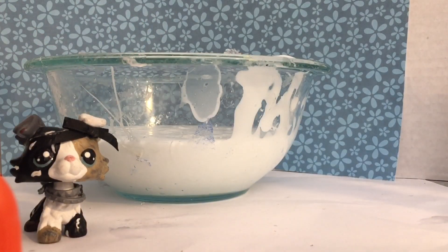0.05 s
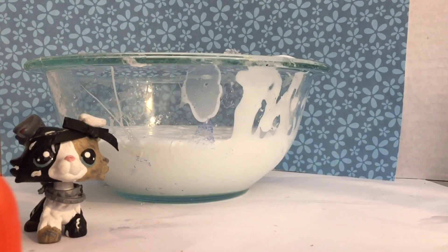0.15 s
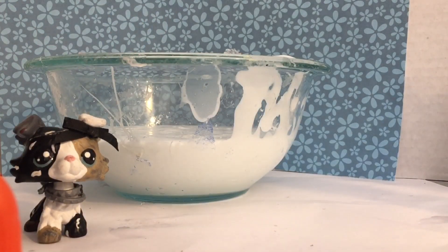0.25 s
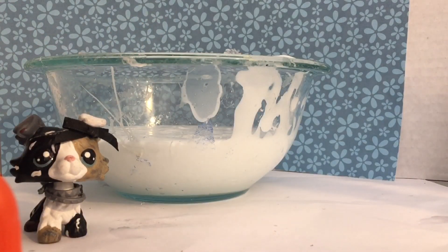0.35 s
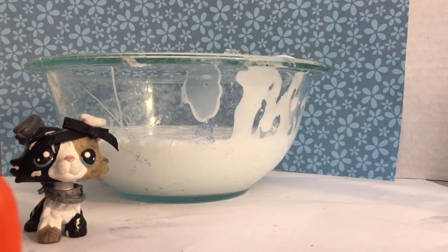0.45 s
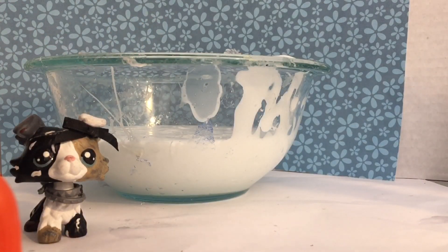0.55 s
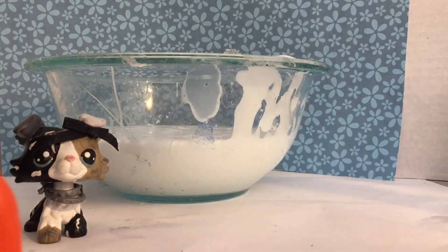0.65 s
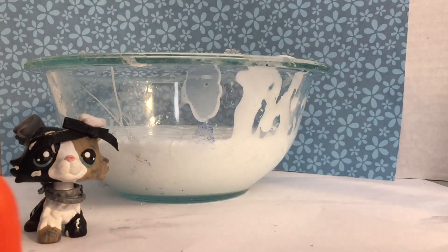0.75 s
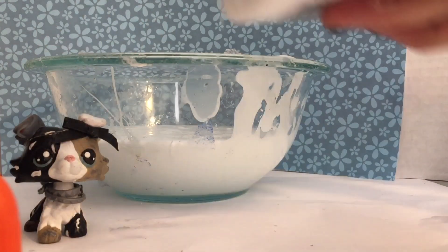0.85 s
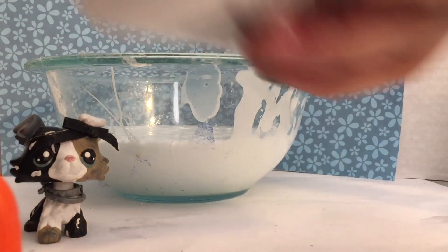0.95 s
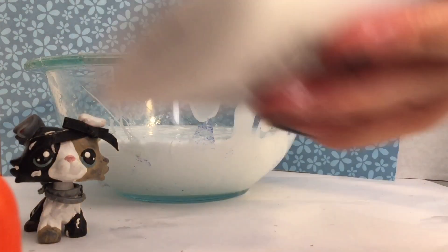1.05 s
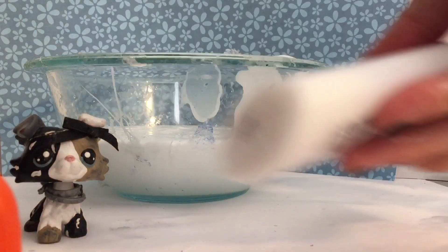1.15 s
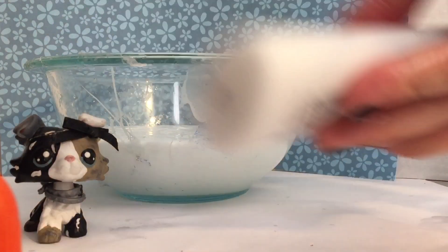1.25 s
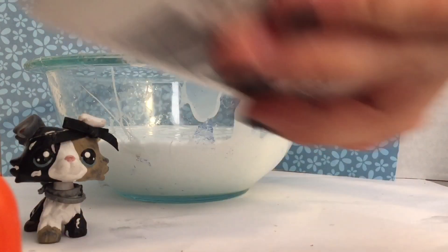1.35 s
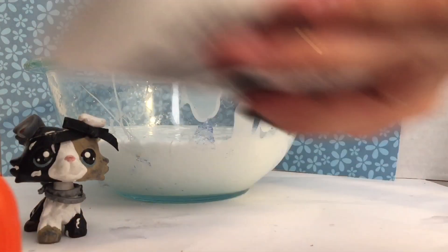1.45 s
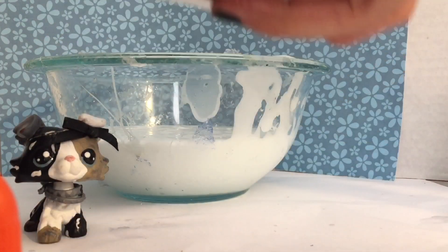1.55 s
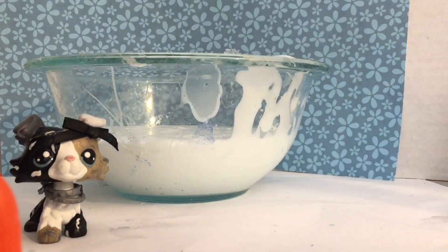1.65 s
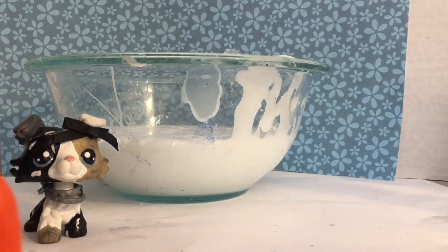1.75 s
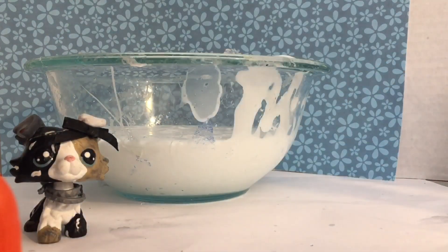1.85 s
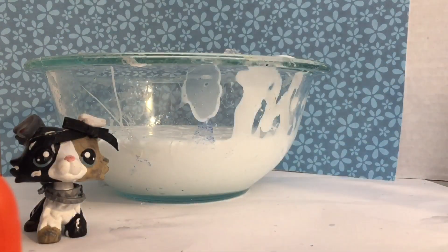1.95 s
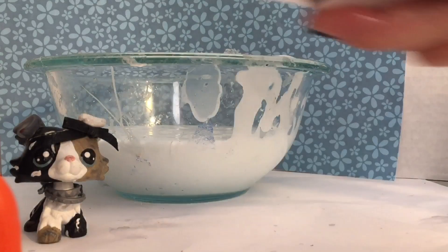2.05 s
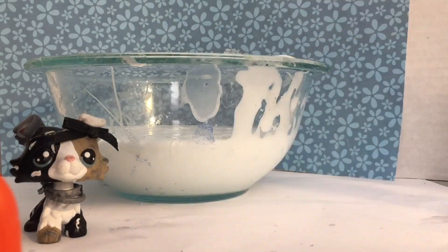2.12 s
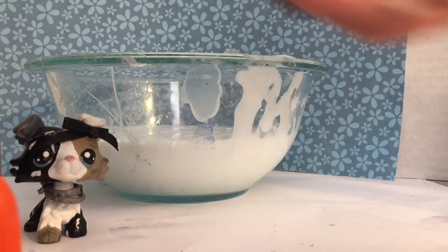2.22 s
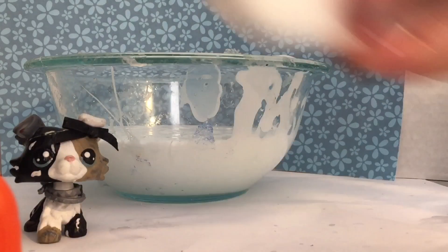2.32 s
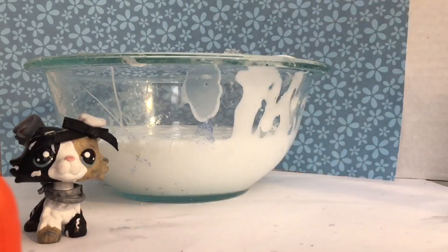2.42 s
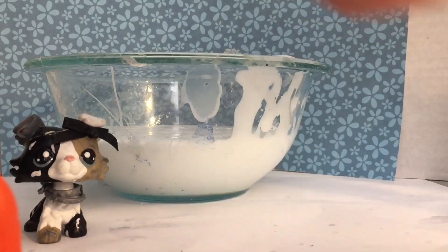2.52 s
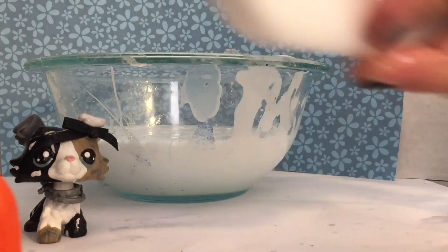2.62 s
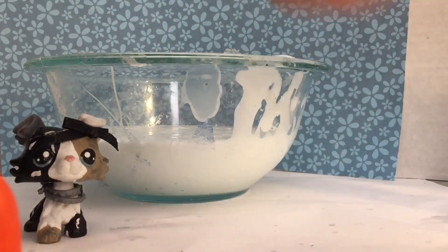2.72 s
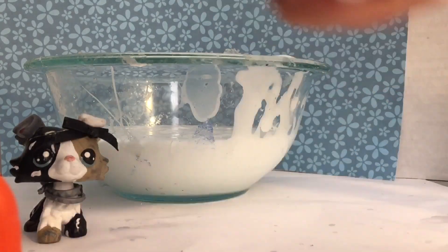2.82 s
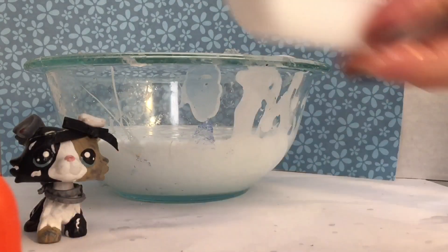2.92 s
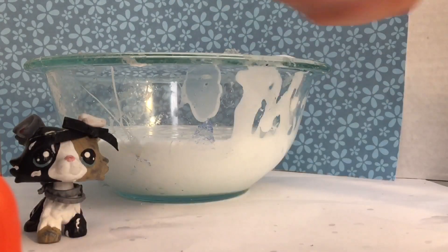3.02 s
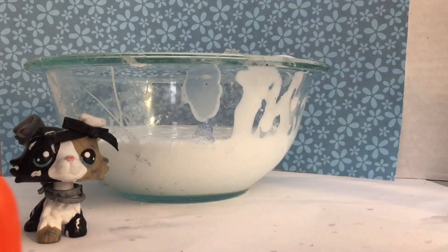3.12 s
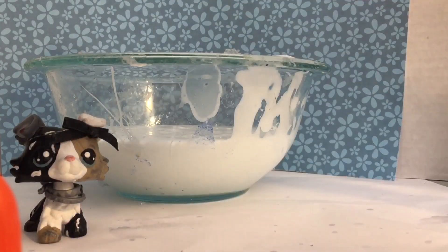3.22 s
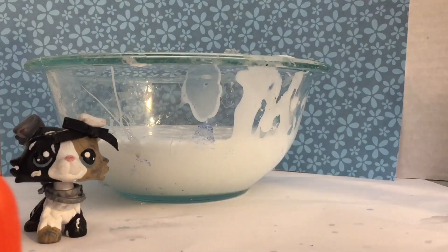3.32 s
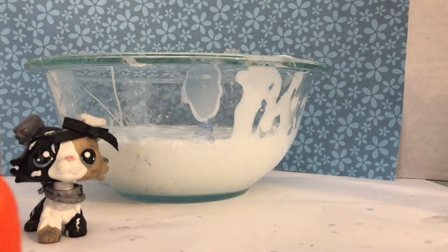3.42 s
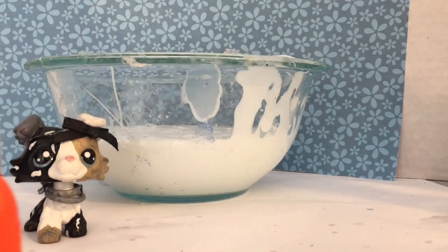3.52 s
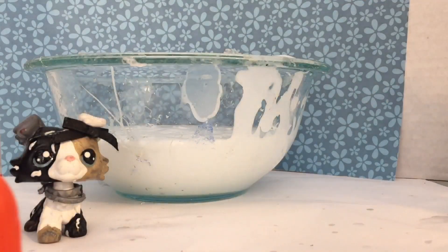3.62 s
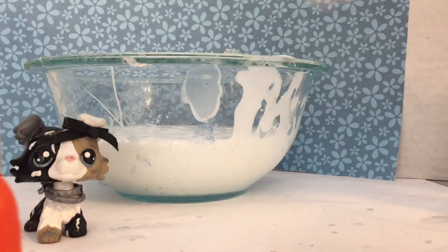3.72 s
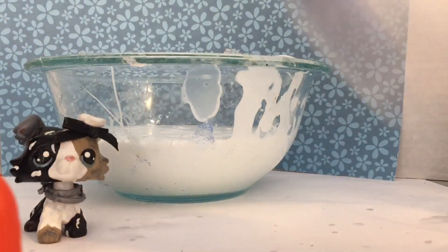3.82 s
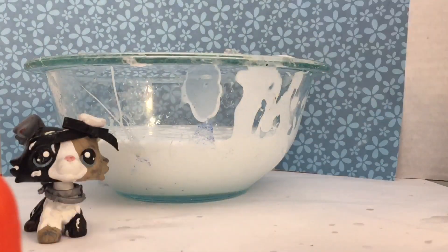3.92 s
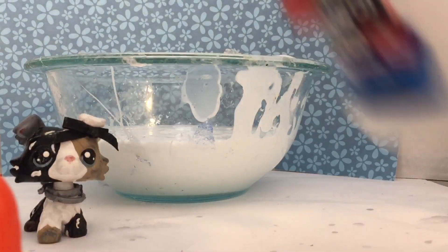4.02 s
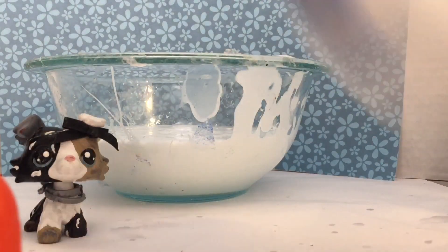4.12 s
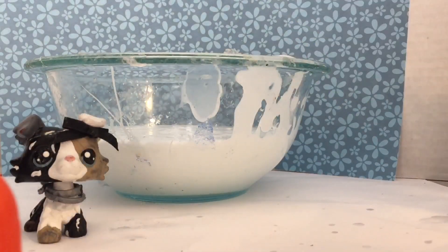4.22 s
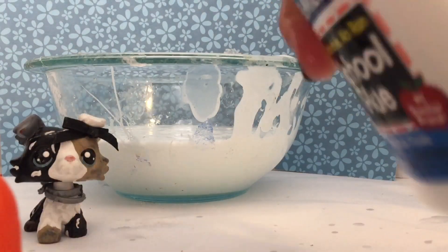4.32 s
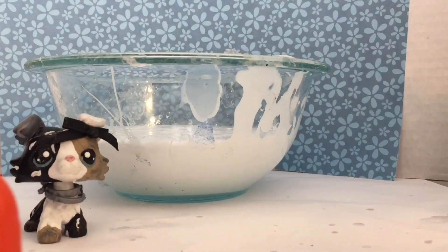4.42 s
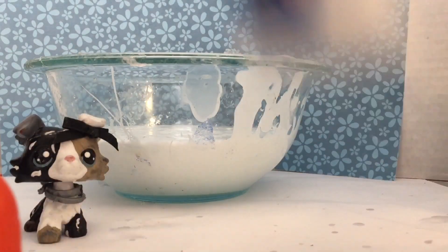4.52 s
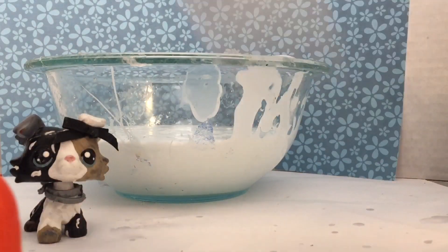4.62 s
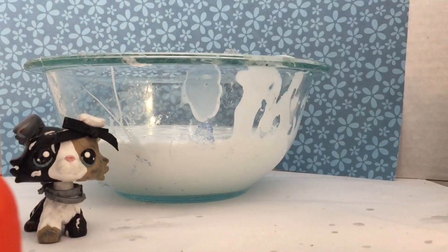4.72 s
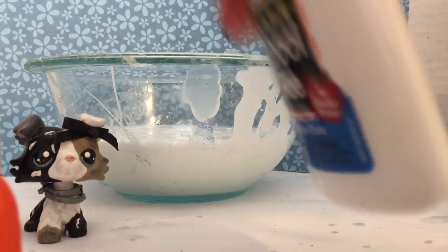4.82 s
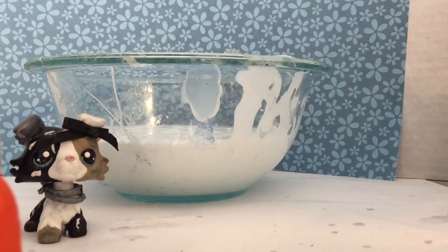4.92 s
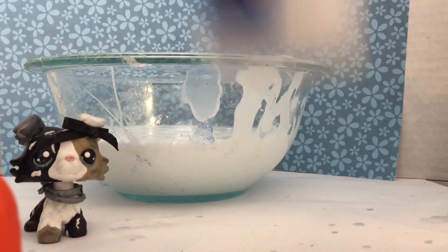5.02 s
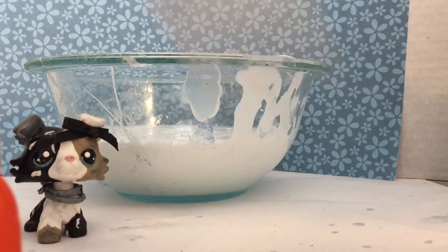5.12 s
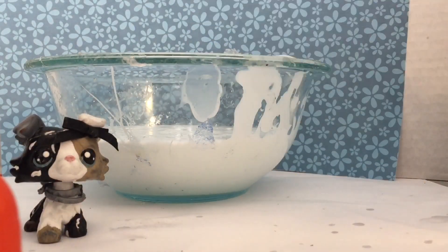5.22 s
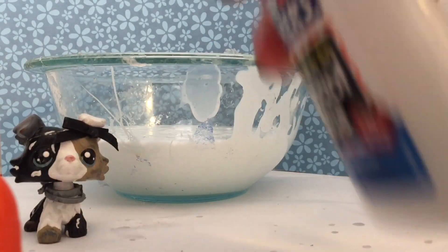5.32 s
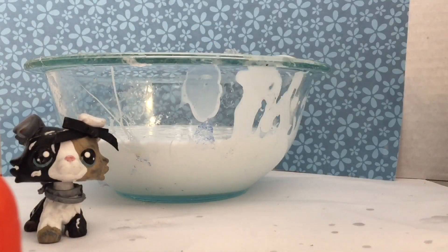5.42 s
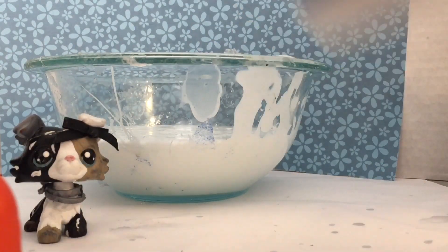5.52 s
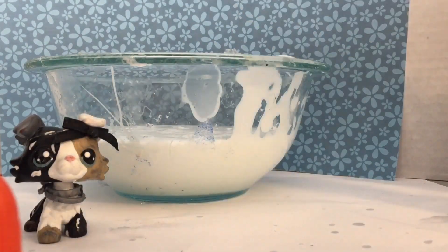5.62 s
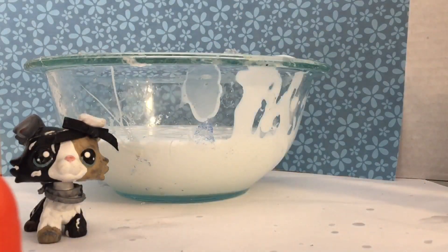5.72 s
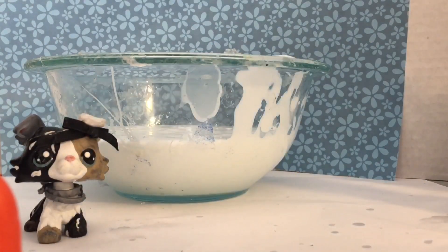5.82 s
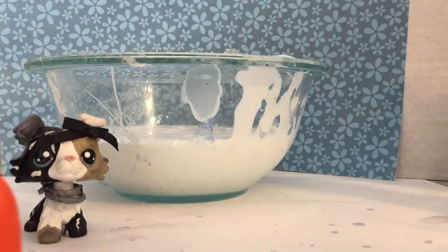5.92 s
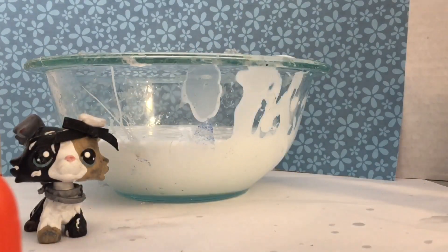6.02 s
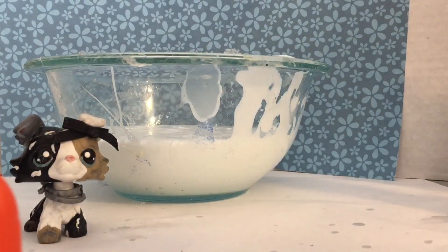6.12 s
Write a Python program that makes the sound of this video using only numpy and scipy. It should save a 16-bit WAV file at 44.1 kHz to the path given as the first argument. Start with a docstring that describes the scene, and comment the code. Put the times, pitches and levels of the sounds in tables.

```python
"""In a small room, close up, a plastic glue bottle with some water in it is shaken hard in three bouts.
At each turn of the hand the liquid surges against a wall: short-lived bubbles ring through the plastic
and foam crackles. Big air pockets plop, films snap and air whistles thinly at the nozzle.
Between bouts the hand rubs and bumps the bottle. Under it lie room tone, hum and air stirred by the arm."""
import sys
import numpy as np
from scipy import signal
from scipy.fft import rfft, irfft
from scipy.io import wavfile
from scipy.ndimage import uniform_filter1d, map_coordinates

SR = 44100
rng = np.random.default_rng(int(sys.argv[2]) if len(sys.argv) > 2 else 0)


def put_to_file(sound):
    """Save the sound as 16-bit audio at rate SR, in the file named by the first command-line argument."""
    columns = np.atleast_2d(sound).T  # one column per channel
    safe = np.clip(columns, -1, 1)
    whole_steps = np.round(safe * 32767)
    wavfile.write(sys.argv[1], SR, whole_steps.astype(np.int16))


N = 271215
TOP_HZ, NOZZLE_HZ = 16150, 9610  # band limit; pitch of the nozzle

# quick flicks of the wrist: t/s, bubble level/dB, foam level/dB
WRIST_FLICKS = [(0.868, -56, -46), (0.938, -32, -41.5), (1.005, -36.5, -36), (1.074, -34, -38),
                (1.14, -34, -35), (1.213, -29.5, -37.5), (1.27, -37, -35.5), (1.338, -33, -37.5),
                (1.403, -29.5, -33.5), (1.475, -31, -34), (1.534, -34, -35.5), (1.585, -36.5, -43),
                (2.185, -41, -46), (2.245, -25.5, -36.5), (2.312, -33, -35), (2.393, -29.5, -39),
                (2.464, -31, -32.5), (2.544, -28.5, -37.5), (2.603, -31, -33.5), (2.689, -31, -36.5),
                (2.751, -34, -32.5), (2.824, -34, -40.5), (2.885, -45, -37), (2.964, -32, -37.5),
                (3.028, -26, -35.5), (3.107, -38, -40.5), (3.215, -41.5, -55), (5.723, -39.5, -49),
                (5.808, -34, -39.5)]
# long arm strokes in the last bout: landing t/s, its bubble level/dB, slap lead/s, its bubble level/dB
ARM_STROKES = [(3.804, -27, 0.049, -34), (3.971, -24.5, 0.062, -27), (4.134, -23.5, 0.07, -33.5),
               (4.278, -26, 0.065, -27), (4.446, -25.5, 0.073, -33), (4.611, -21.5, 0.068, -33),
               (4.781, -23, 0.074, -29.5), (4.947, -22, 0.065, -28.5), (5.112, -21.5, 0.071, -29.5),
               (5.277, -24.5, 0.068, -28.5), (5.426, -23, 0.07, -28), (5.604, -29, 0.078, -32),
               (5.906, -26, 0.056, -63), (6.067, -27.5, 0.099, -34.5)]
def surges():
    """Cue list for the slosh: a flick throws the liquid once, a stroke twice."""
    # envelopes: rise/s, hold/s, fall/s
    flick = (0.007, 0.017, 0.03)  # the liquid hits a wall and runs off
    slap = (0.006, 0.00317, 0.067)  # on the back swing it slaps one end and slides along the bottle
    landing = (0.014, 0.024, 0.0075)  # then the whole load piles up and stops
    # cues: t/s, bubble level/dB, foam level/dB, envelope, bubble f/Hz, spray against crackle/dB
    cues = [(s, db, foam_db, flick, 763.6, -7.5) for s, db, foam_db in WRIST_FLICKS]
    for s, landing_db, lead, slap_db in ARM_STROKES:
        for at, db, envelope, hz in [(s - lead, slap_db, slap, 897), (s, landing_db, landing, 898.6)]:
            foam_db = -33.5 + 0.51 * (db + 25.5)  # harder surges raise more foam
            cues.append((at, db, foam_db, envelope, hz, -13.5))
    return cues


# what the plastic wall lets through: f/Hz, level/dB
WALL_EQ = [(40, -20), (150, 6), (340, -1), (470, -2.5), (610, -3), (695, 5), (780, -3.5), (1000, 0),
           (1300, -6.5), (1650, 1), (2300, -11), (4000, -5.5), (9000, -38)]
# colour of the foam: f/Hz, level/dB
FOAM_EQ = [(300, -17.5), (1200, 11.5), (2300, 0.5), (4100, -0.5), (6200, -3), (8500, -7), (9600, -5),
           (10600, -13.5), (16000, -19.5)]
def slosh():
    """Each surge folds air into the liquid: a gurgle, a crackle of foam and a spray of tearing films."""
    out = np.zeros(N)
    for s, bubble_db, foam_db, (rise, hold, fall), pitch_hz, spray_db in surges():
        t = np.arange(-int(4 * rise * SR), int((hold + 3.5 * fall) * SR)) / SR
        crest = np.exp(-np.maximum(-t / rise, np.maximum(t - hold, 0) / fall) ** 0.98)
        # thick liquid breaks in lumps, most on the flanks; foam has its own clumps and dies sooner
        swell = crest * amp(8.3 * flutter(t, rate=150) * (1 - crest / 2))
        foam_swell = swell * crest ** 0.18 * amp(4 * flutter(t, rate=150))
        gurgle = bubbles(len(t), rate=620, hz=pitch_hz, spread=0.5605, cycles=2.07, scatter_db=5)
        crackle = bubbles(len(t), rate=2400, hz=4900, spread=0.557, cycles=3.5, scatter_db=5, size=400)
        fizz = coloured(crackle + rng.standard_normal(len(t)), FOAM_EQ, size=512)
        foam = unit(fizz) + amp(spray_db) * tearing(len(t), rate=500, scatter_db=8.5)
        detune = np.exp(0.044 * rng.standard_normal())  # the moving load retunes the wall each surge
        gurgle = coloured(gurgle, np.array(WALL_EQ) * [detune, 1], size=2048)
        add(out, s + t[0], amp(bubble_db - 1) * swelled(gurgle, swell))
        add(out, s + t[0], amp(foam_db + 1) * swelled(foam, foam_swell))
    return out


def bubbles(n, rate, hz, spread, cycles, scatter_db, size=1000):
    """A cloud of bubbles, n samples long: each rings a few cycles, rising in pitch."""
    draws = rng.standard_normal((int(rate * n / SR) + 1, 4))
    starts = ((np.arange(len(draws)) + draws[:, 0]) * SR / rate).astype(int) % n
    pitch, weight, life = np.clip(draws[:, 1:], -2, 2).T[:, :, None]
    turns = np.minimum(hz * np.exp(spread * pitch), TOP_HZ) * np.arange(size) / SR
    age = turns / (cycles * np.exp(0.5 * life))
    strength = amp(scatter_db * weight) * np.exp(spread * pitch / 2)
    polarity = rng.choice([-1, 1], (len(draws), 1))
    envelope = (1 - np.exp(-4 * age)) * np.exp(-age)
    rings = polarity * strength * envelope * np.sin(2 * np.pi * turns * (1 + 0.018 * age))
    slots = (starts[:, None] + np.arange(size)) % n
    return unit(np.bincount(slots.ravel(), rings.ravel(), n))


# colour of tearing glue films: f/Hz, level/dB
FILM_EQ = [(1500, -11), (9000, 1)]
def tearing(n, rate, scatter_db, life_s=0.0007):
    """Sticky films tear for n samples: bright, very short bursts of uneven size."""
    tears = (rng.random(n) < rate / SR) * amp(scatter_db * np.clip(rng.standard_normal(n), -2, 2))
    energy = signal.lfilter([1], [1, -np.exp(-1 / (life_s * SR))], tears ** 2)
    return unit(coloured(np.sqrt(energy) * rng.standard_normal(n), FILM_EQ, size=512))


# single air pockets, mostly big: crest t/s, level/dB, f/Hz, ring/cycles
AIR_POCKETS = [(.699, -46, 6600, 15), (.817, -44.5, 375, 9.5), (.857, -30.5, 551, 1.3),
               (1.234, -19, 576, 1.3), (1.275, -14.5, 704, 1.2), (1.524, -18, 705, 1),
               (1.715, -29, 1310, 3.5), (2.327, -16.5, 973, 3.8), (2.685, -19, 722, 5.4),
               (2.742, -12.5, 678, 1.9), (2.768, -14.5, 942, 5.1), (2.901, -7.5, 703, 1.05),
               (2.937, -16, 644, 1.7), (2.981, -23, 1620, 5.4), (3.041, -15, 302, 0.56),
               (3.056, -26, 1370, 4.5), (3.169, -19, 813, 0.77), (3.208, -21.5, 471, 2),
               (3.218, -30, 564, 6.5), (3.224, -32.5, 1560, 13), (3.755, -21, 391, 2.1),
               (3.913, -12, 1015, 2), (4.044, -22.5, 744, 2.3), (4.155, -17, 582, 2),
               (4.274, -13.5, 715, 5.5), (4.378, -17.5, 720, 2.4), (4.431, -14.5, 824, 3.8),
               (4.462, -9.5, 672, 3.3), (4.6, -16.5, 600, 2.2), (4.62, -10, 663, 1.9),
               (4.776, -20, 797, 1.5), (4.963, -13.5, 687, 2), (5.065, -6.5, 594, 0.89),
               (5.108, -10, 724, 1.3), (5.12, -12, 718, 2), (5.297, -14, 645, 0.98),
               (5.431, -14.5, 1710, 5.2), (5.611, -7.5, 566, 1.3), (5.725, -16.5, 1684, 3.7),
               (5.864, -23, 316, 1.3), (6.083, -10.5, 466.6, 0.96)]
def plops(rise_cycles=0.5, glide=0.032):
    """An air pocket swells quickly, rings and bends a little up in pitch, splashing as it forms."""
    out = np.zeros(N)
    for s, db, hz, cycles in AIR_POCKETS:
        rise, life = rise_cycles / hz, cycles / hz
        t = np.arange(-int(10 * rise * SR), int(10 * life * SR)) / SR
        envelope = 1 / (np.exp(-t / rise) + np.exp(t / life))
        phase = 2 * np.pi * (hz * t * (1 + glide * t / life / 2) + rng.random())
        splash_eq = [(hz / 12, -16), (hz, 0), (hz * 2, -5), (hz * 10, -34)]
        spatter = unit(coloured(rng.standard_normal(len(t)), splash_eq, size=2048))
        splash = amp(-5) * spatter * np.exp(-np.abs(t) / 0.014)
        add(out, s + t[0], amp(db - 2) * envelope / envelope.max() * (np.sin(phase) + splash))
    return out


# sharp accents of foam and plastic: t/s, peak level/dB, centre f/Hz
SNAP_HITS = [(.18, -39.5, 11500), (0.51, -39.5, 11600), (.794, -32, 6350), (0.855, -24.5, 1430),
             (1.212, -18.5, 5700), (1.295, -21, 10800), (1.617, -23, 11800), (2.197, -16, 9600),
             (2.618, -26, 1880), (2.728, -18.5, 1660), (2.898, -10, 3250), (3.043, -17, 2390),
             (3.357, -45, 11000), (3.579, -44, 9050), (3.906, -10.5, 4100), (4.282, -12.5, 3240),
             (4.536, -26, 1480), (5.045, -14.5, 1300), (5.126, -17, 8200), (5.356, -12.5, 2070),
             (5.619, -11, 4940), (5.889, -19, 4200), (6.009, -22, 2510), (6.08, -13.5, 2750)]
def snaps(t60=0.014):
    """A film bursts or the wall flicks: a tight crack around one pitch."""
    out, t = np.zeros(N), np.arange(SR // 50) / SR
    for s, db, hz in SNAP_HITS:
        burst = rng.standard_normal(len(t)) * amp(-60 * t / t60)
        crack_eq = [(hz / 8, -20), (hz / 2, -7), (hz, 0), (hz * 2, -13), (hz * 4, -25)]
        crack = coloured(burst, crack_eq, size=512)
        add(out, s, amp(db) * crack / np.abs(crack).max())
    return out


# air squeezed out at the nozzle: crest t/s, level/dB
NOZZLE_WHISTLES = [(1.052, -33), (2.342, -28), (2.494, -19.5), (3.302, -48), (3.342, -50), (3.378, -49),
                   (3.415, -53), (3.69, -32.5), (4.541, -33.5), (5.375, -23.5), (5.386, -26)]
def whistles(half_s=0.003, waver_hz=170):
    """Pressure inside pushes short, thin whistles through the nozzle, each in a puff of air."""
    out, t = np.zeros(N), np.arange(-SR // 20, SR // 20) / SR
    puff_eq = [(5000, -20), (NOZZLE_HZ, 0), (12000, -10)]
    for s, db in NOZZLE_WHISTLES:
        hz = NOZZLE_HZ + waver_hz * unit(uniform_filter1d(rng.standard_normal(len(t)), size=60))
        tone = np.exp(-(t / half_s) ** 2) * np.sin(2 * np.pi * np.cumsum(hz) / SR)
        hiss = unit(coloured(rng.standard_normal(len(t)), puff_eq, size=512))
        puff = amp(-12.5) * np.exp(-np.abs(t) / 0.008) * hiss
        add(out, s + t[0], amp(db) * (tone + puff))
    return out


def settling(liquid, drain_s=0.2):
    """Stirred films tick, foam rustles and the nozzle chirps; then the glue gurgles softly to rest."""
    stir = np.sqrt(np.abs(uniform_filter1d(liquid ** 2, size=3000)))
    stir = np.tanh(14 * stir / stir.max())  # even gentle shaking tears the films
    ticks = tearing(N, rate=200, scatter_db=6)
    nozzle_eq = [(NOZZLE_HZ - 900, -40), (NOZZLE_HZ, 0), (NOZZLE_HZ + 900, -40)]
    chirps = unit(coloured(tearing(N, rate=22, scatter_db=5), nozzle_eq, size=2048))
    pole = np.exp(-1 / (drain_s * SR))
    wetness = signal.lfilter([1 - pole], [1, -pole], stir)  # the wet wall drains slowly
    dribble = bubbles(N, rate=400, hz=330, spread=0.5, cycles=1.2, scatter_db=3)
    rustle = bubbles(N, rate=500, hz=2600, spread=0.6, cycles=2.5, scatter_db=7, size=400)
    treble = amp(-56.5) * stir * ticks + (amp(-56) * stir + amp(-75.5)) * chirps
    return treble + amp(-54.5) * wetness * dribble + amp(-58.5) * wetness ** 3 * rustle


# soft knocks of the hand: t/s, peak level/dB
HAND_BUMPS = [(0.226, -37.5), (.527, -35.5), (1.825, -21.5)]
# resonances of the held bottle: f/Hz, level/dB, t60/s
BOTTLE_MODES = [(208, 12.5, 0.016), (291, 3.5, 0.034), (1140, 2, 0.0098)]
def bumps(attack_s=0.0048):
    """The hand knocks the hollow bottle softly: one push, then a short ring."""
    out, t = np.zeros(N), np.arange(SR // 8) / SR
    ring = sum(amp(db - 60 * t / t60) * np.sin(2 * np.pi * hz * t) for hz, db, t60 in BOTTLE_MODES)
    ring *= 1 - np.exp(-t / attack_s)
    for s, db in HAND_BUMPS:
        add(out, s, amp(db) * ring / np.abs(ring).max())
    return out


# fingers sliding on the plastic: crest t/s, level/dB, half length/s, roll-off f/Hz
FINGER_RUBS = [(0.076, -62.5, 0.021, 14000), (0.645, -61, 0.0063, 3500), (.836, -45, 0.012, 7000),
               (1.693, -53, 0.0063, 4000), (2.114, -50.5, 0.014, 2140), (2.168, -43, 0.025, 5500),
               (3.722, -56.5, 0.044, 9150)]
def rubs():
    """A shifting grip sticks and slips on the plastic: a short, grainy hiss."""
    out, t = np.zeros(N), np.arange(-SR // 10, SR // 10) / SR
    for s, db, half_s, hz in FINGER_RUBS:
        slips = coloured(tearing(len(t), rate=1800, scatter_db=5), [(hz, 0), (hz * 4, -30)], size=512)
        add(out, s + t[0], amp(db) * unit(slips) * np.exp(-(t / half_s) ** 2))
    return out


# decay of the small room: f/Hz, t60/s
ROOM_DECAY = [(150, 0.2), (700, 0.11), (3000, 0.19), (12000, 0.0089)]
def room(x, wet_db):
    """The walls answer after a few milliseconds, treble dying first."""
    hz, t, noise = signal.stft(rng.standard_normal(SR // 2), SR, nperseg=256)
    tail = signal.istft(noise * amp(-60 * t / along(ROOM_DECAY, hz)[:, None]), SR, nperseg=256)[1]
    tail = np.pad(tail / np.linalg.norm(tail), (SR // 250, 0))  # 4 ms pre-delay
    return amp(wet_db) * signal.fftconvolve(x, tail)[:N]


# colour of the room tone: f/Hz, level/dB
ROOM_TONE_EQ = [(25, -40), (58, 5), (85, -6.5), (200, -20), (320, -11.5), (450, -31), (700, -25.5),
                (5000, -39), (10000, -41.5), (16000, -48)]
# mains hum: f/Hz, rms level/dB
HUM_TONES = [(59, -61.5), (120, -63), (705, -81.5)]
# fader ride of the air stirred by the arm: t/s, level/dB
ARM_AIR = [(.3, -62), (.85, -50.5), (1.9, -92), (3.1, -55.5), (4.1, -48.5), (5.4, -52), (6.1, -56)]
def background():
    """The bed: room tone, mains hum and the low rumble of stirred air."""
    t = np.arange(N) / SR
    tone = amp(-56) * unit(coloured(rng.standard_normal(N), ROOM_TONE_EQ))
    hum = sum(amp(db) * np.sqrt(2) * np.sin(2 * np.pi * hz * t) for hz, db in HUM_TONES)
    rumble = unit(coloured(rng.standard_normal(N), [(25, -48), (57, -5), (110, -17), (800, -86)]))
    return tone + hum + amp(np.interp(t, *np.transpose(ARM_AIR))) * rumble


def amp(db):
    return 10 ** (np.asarray(db) / 20)


def unit(x):
    return x / np.sqrt(np.mean(x ** 2) + 1e-20)


def along(points, hz):
    """Read a curve of (f/Hz, value) points on a log axis."""
    f, v = np.transpose(points)
    return np.interp(np.log(hz + 1), np.log(f + 1), v)


def add(track, s, x):
    """Mix x into the track from time s on."""
    start = max(round(s * SR), 0)
    track[start:start + len(x)] += x[:max(N - start, 0)]


def coloured(x, points, size=16384):
    """Minimum-phase EQ through (f/Hz, level/dB) points."""
    cepstrum = irfft(np.log(amp(along(points, np.fft.rfftfreq(size, 1 / SR)))))
    cepstrum[1:size // 2] *= 2
    cepstrum[size // 2 + 1:] = 0
    impulse = irfft(np.exp(rfft(cepstrum)))[:size // 2]
    return signal.fftconvolve(x, impulse)[:len(x)]


def flutter(t, rate):
    """A random wobble between -1 and 1, with `rate` new values a second."""
    return np.tanh(map_coordinates(rng.standard_normal(len(t)), [(t - t[0]) * rate], order=1))


def swelled(x, swell):
    """Level x out, then shape it so that the swell sets the energy."""
    level = np.sqrt(np.abs(uniform_filter1d(x ** 2, size=500)) + 1e-12)
    return unit(x / level * swell) * np.sqrt(np.mean(swell ** 2))


def scene():
    """The bottle up front, with a touch of room, over the bed."""
    liquid = slosh()
    bottle = liquid + settling(liquid) + plops() + snaps() + whistles() + bumps() + rubs()
    return (bottle + room(bottle, wet_db=-17.5) + background())[None]


def record(dry):
    """A steep low-pass takes off the very top."""
    lowpass = signal.firwin(301, TOP_HZ, fs=SR, window="blackman")
    return signal.fftconvolve(dry, lowpass[None], mode="same", axes=1)


dry = scene()
out = record(dry)
put_to_file(out)
```